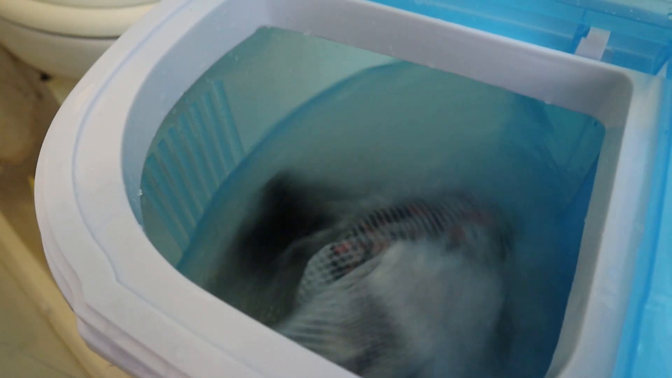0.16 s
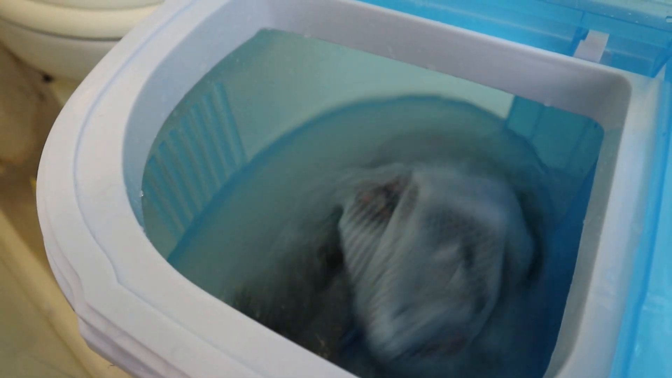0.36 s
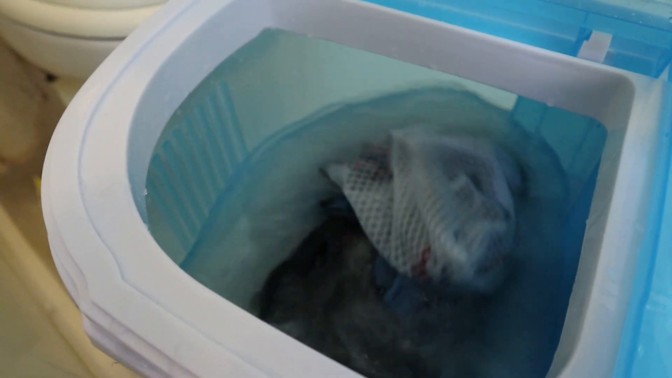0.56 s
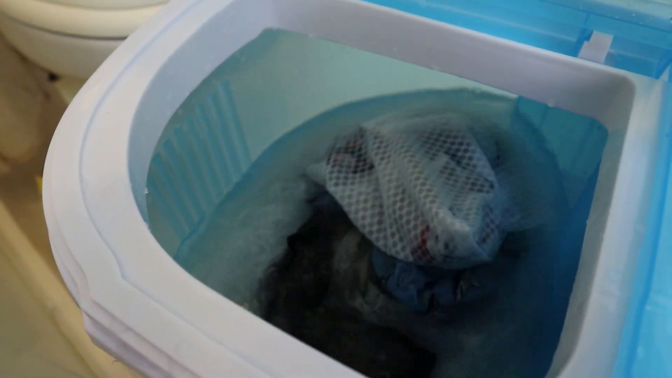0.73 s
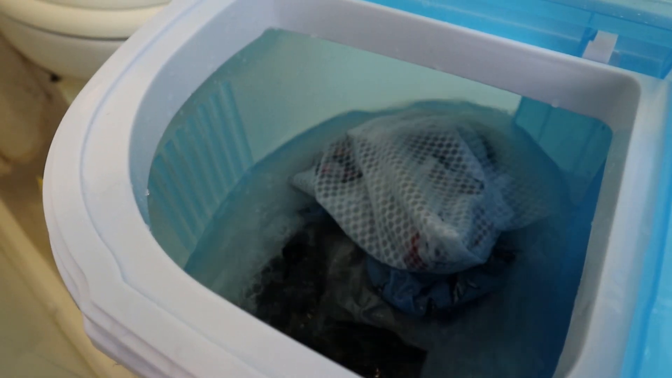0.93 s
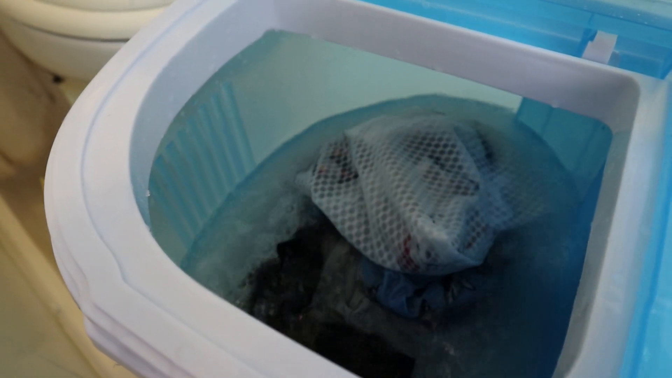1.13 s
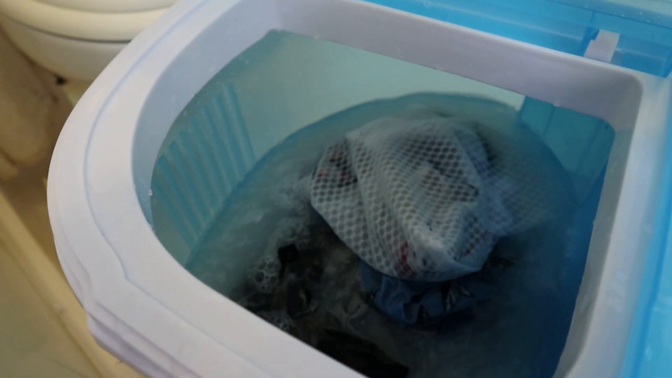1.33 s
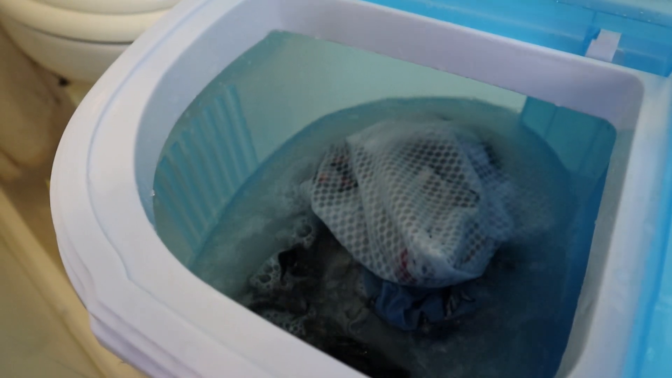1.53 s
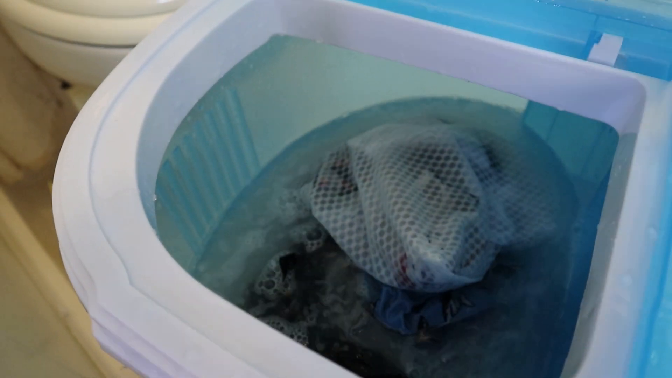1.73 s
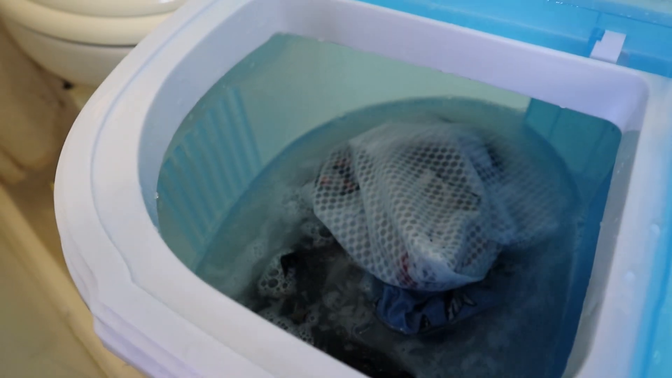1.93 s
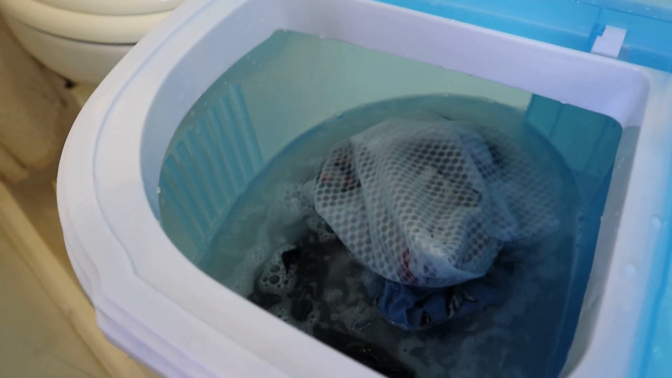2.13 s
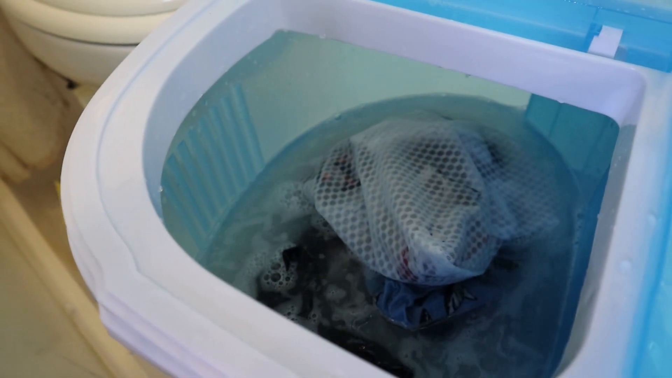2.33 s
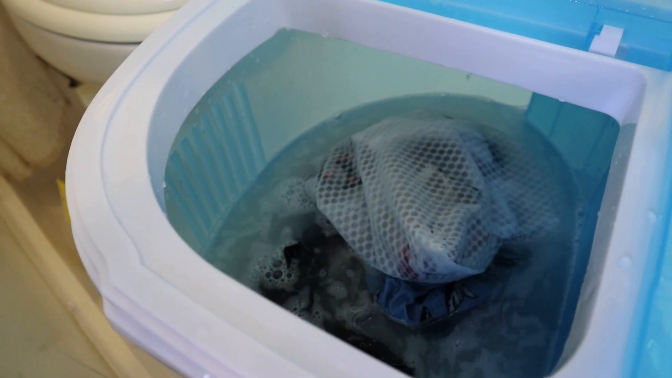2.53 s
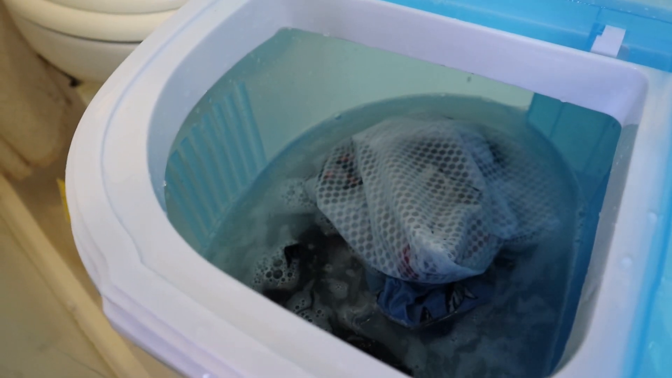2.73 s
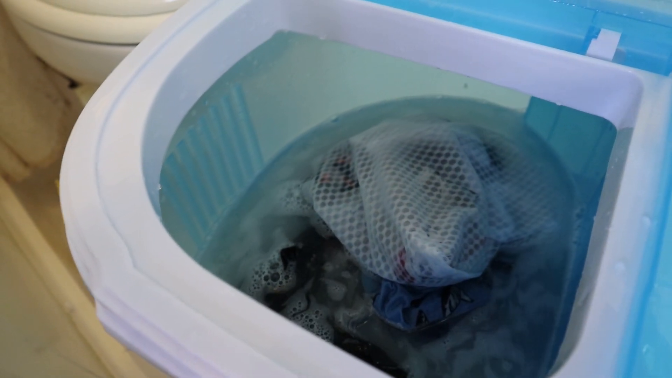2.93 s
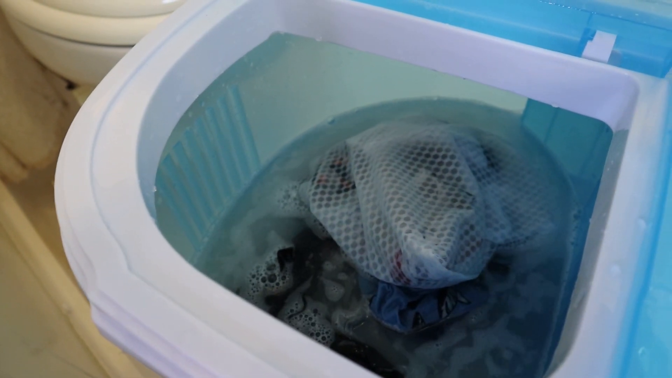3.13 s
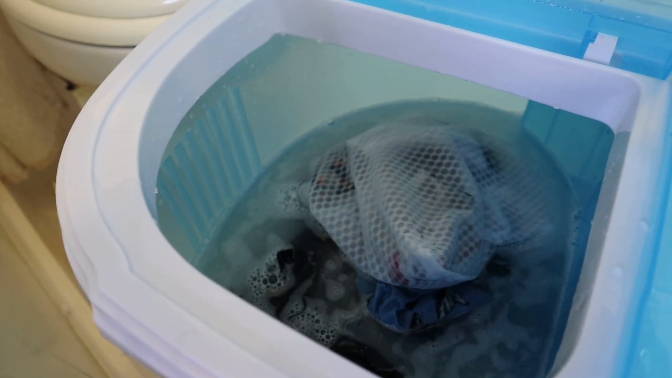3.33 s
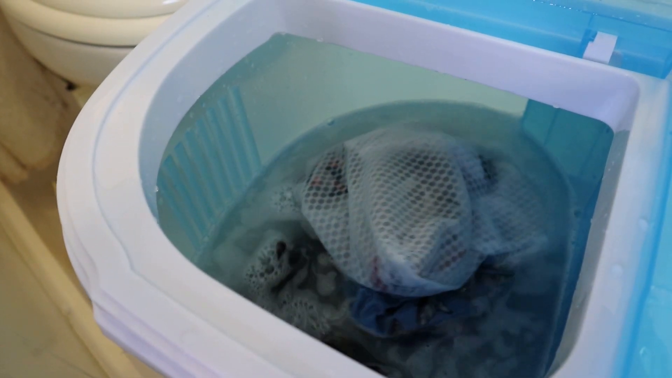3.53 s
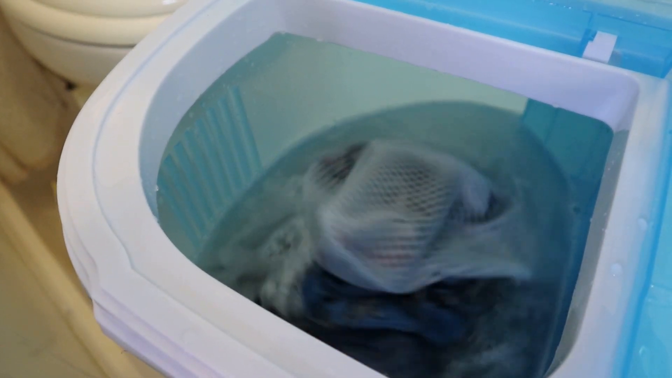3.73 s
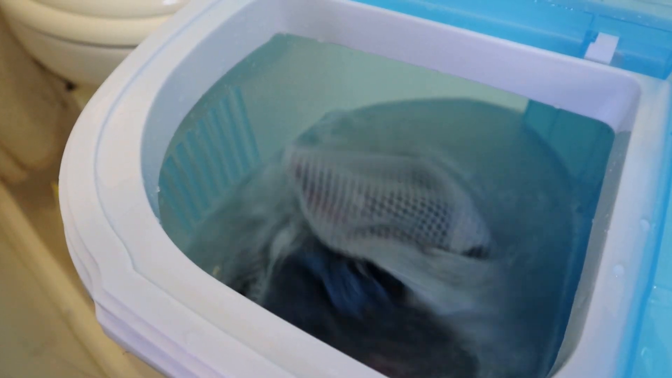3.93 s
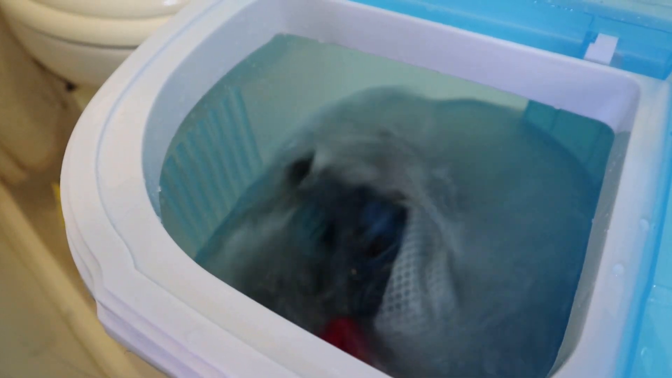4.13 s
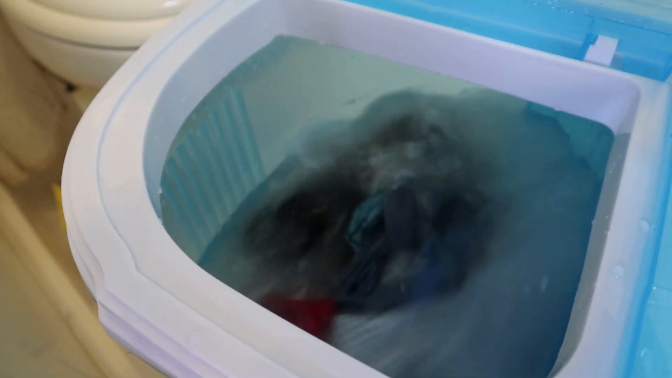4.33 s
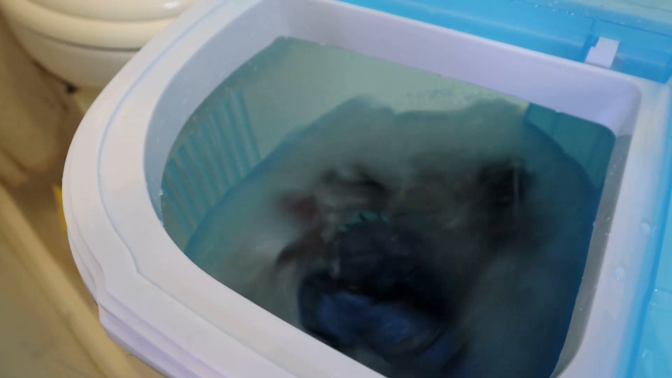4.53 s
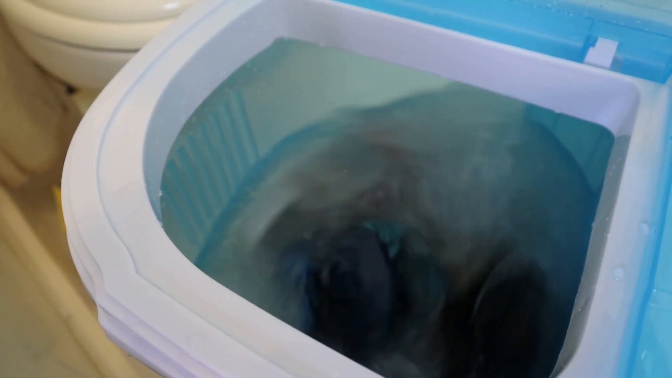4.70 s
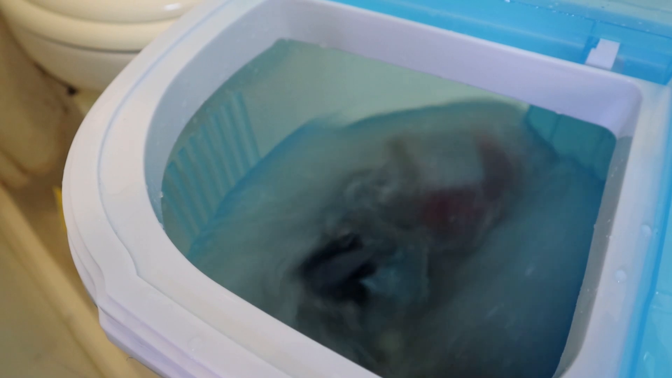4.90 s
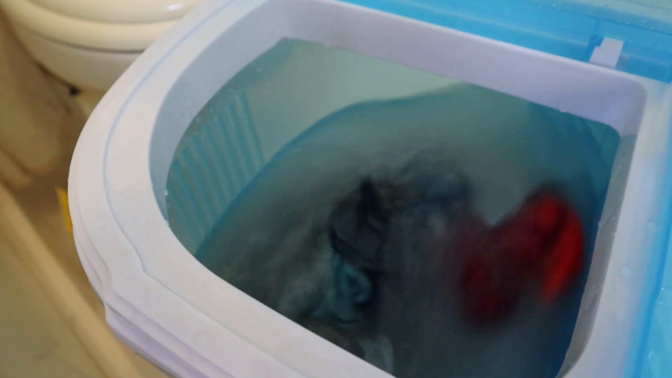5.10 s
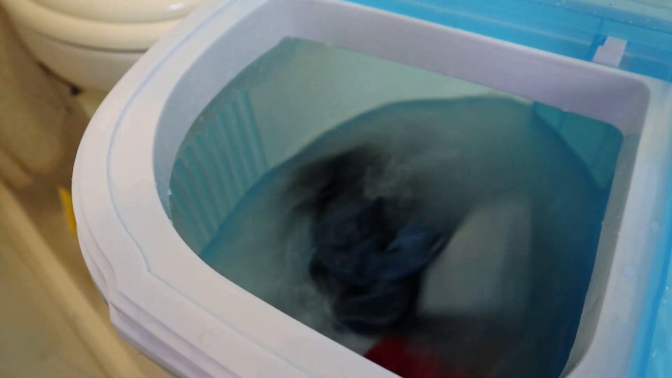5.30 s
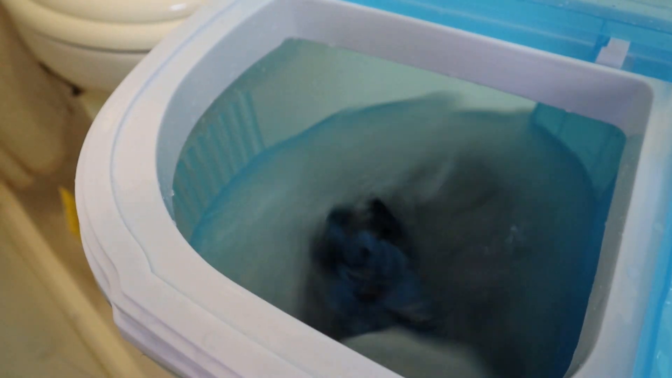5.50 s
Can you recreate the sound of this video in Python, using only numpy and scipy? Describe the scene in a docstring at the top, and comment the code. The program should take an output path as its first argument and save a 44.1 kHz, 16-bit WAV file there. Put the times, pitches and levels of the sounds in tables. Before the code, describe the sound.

A small plastic washing machine is heard from just above its open tub in a bathroom. At the start, water sloshes and splashes with gurgles and low bumps against the tub, dying away by about 1 second. A clockwork timer ticks rapidly throughout, around fifteen times a second, and stands out in the lull. Between 1 and 2 seconds there are faint popping suds, a couple of drips and soft gurgles. At about 3.2 seconds a switch snaps sharply with a brief squeak, and the motor starts with a steady low hum, rumble and light belt hiss. The ticking continues more softly. From about 4 seconds water and clothes churn again, with bubbling and wet slaps coming in waves, strongest around 4.4 and 5.3 seconds, and carrying on over the hum until the end, near 5.6 seconds.

```python
"""A small plastic washing machine in a bathroom, heard from just above its open tub.
At first the water sloshes to rest, its trapped air ringing as bubbles, while the clockwork wash timer
ticks about fifteen times a second, each impact exciting the modes of its panel. Suds pop in the lull.
At 3.2 s the timer's contact snaps shut and the motor starts, with magnetic hum and shaft harmonics.
From about 4 s water and clothes churn again, and the timer ticks on more softly."""
import sys
import numpy as np
from scipy import signal
from scipy.fft import rfft, irfft
from scipy.io import wavfile
from scipy.ndimage import uniform_filter1d

SR = 44100
rng = np.random.default_rng(int(sys.argv[2]) if len(sys.argv) > 2 else 0)


def transcribe(signal):
    """Save signal, clipped to [-1, 1], as a 16-bit WAV file at the path in sys.argv[1]."""
    frames = np.atleast_2d(signal).T
    limited = np.clip(frames, -1, 1)
    pcm = np.round(limited * 32767).astype(np.int16)
    wavfile.write(sys.argv[1], SR, pcm)


N = 245195
TIME = np.arange(N) / SR
AGE = np.arange(SR // 5) / SR  # time since an impact [s]


def gain_of(db):
    """Amplitude ratio of a level in decibels."""
    return 10 ** (np.asarray(db) / 20)


def unit_rms(x):
    """Normalisation to a mean power of 1."""
    return x / np.sqrt(np.mean(x ** 2) + 1e-20)


def unit_peak(x):
    """Normalisation of the loudest few milliseconds to a mean power of 1."""
    return x / np.sqrt(uniform_filter1d(x ** 2, size=150).max() + 1e-20)


def value_at(points, hz):
    """Interpolation on a logarithmic frequency axis."""
    f, value = np.transpose(points)
    return np.interp(np.log(hz + 1), np.log(f + 1), value)


def add(mix, s, sound):
    """Superposition of a sound on the mix, from time s."""
    part = mix[max(round(s * SR), 0):][:len(sound)]
    part += sound[:len(part)]


def coloured(x, spectrum, size=8192):
    """Minimum-phase filtering: a causal response with the given spectrum."""
    log_gain = np.log(gain_of(value_at(spectrum, abs(np.fft.fftfreq(size, 1 / SR)))))
    response = np.exp(np.conj(signal.hilbert(log_gain)))
    taps = np.fft.ifft(response).real[:size // 2]
    return signal.fftconvolve(x, taps)[:len(x)]


def noise(spectrum):
    """Stationary Gaussian noise of rms 1 with the given spectrum."""
    return unit_rms(coloured(rng.standard_normal(N), spectrum))


def wander(cutoff_hz):
    """Slow random modulation: low-pass noise of rms 1."""
    hz = np.fft.rfftfreq(N, 1 / SR)
    return unit_rms(irfft(rfft(rng.standard_normal(N)) / (1 + (hz / cutoff_hz) ** 4), N))


def decay(t60):
    """Exponential damping by 60 dB in t60 seconds."""
    return np.exp(-np.log(1000) * AGE / t60)


def onset(rise):
    """Exponential approach to full amplitude, with time constant rise."""
    return 1 - np.exp(-AGE / rise)


def swell(centre, width, t=AGE):
    """Gaussian envelope in time."""
    return np.exp(-.5 * ((t - centre) / width) ** 2)


def ring(hz, t60, rise, glide=0):
    """Damped oscillation whose frequency may climb by the fraction glide."""
    turns = np.cumsum(hz * (1 + glide * np.minimum(AGE / t60, 1))) / SR
    return np.sin(2 * np.pi * turns) * decay(t60) * onset(rise)


def clicks(per_s, spread_db):
    """Poisson process: impulses of random time, sign and size."""
    size = gain_of(spread_db * np.minimum(rng.exponential(1, N), 4))
    return size * rng.choice([-1, 1], N) * (rng.random(N) < per_s / SR)


# Background spectrum: (frequency [Hz], relative level [dB])
BACKGROUND_SPECTRUM = [(15, -13), (25, 4), (52, 8.5), (75, -11.5), (112, -2.5), (190, -10.5), (280, -9.5),
                       (400, -10), (640, -7), (950, -13), (1600, -19), (2700, -27), (3800, -21),
                       (5800, -34), (16000, -38)]
def background():
    """Ambient noise: steady, with its power mostly at low frequencies."""
    return gain_of(-40) * noise(BACKGROUND_SPECTRUM)


# Reverberation time of the room: (frequency [Hz], t60 [s])
ROOM_DECAY = [(100, 0.4), (500, 0.071), (2000, 0.22), (6000, 0.098), (15000, 0.12)]
def bathroom(x):
    """Reverberation: dense reflections from tub and tiles, each band decaying at its own rate."""
    reflections = rng.choice([-1., 1.], SR // 2) * (rng.random(SR // 2) < .1)
    hz, t, bands = signal.stft(reflections, SR, nperseg=256)
    damping = np.exp(-np.log(1000) * t / value_at(ROOM_DECAY, hz)[:, None])
    tail = signal.istft(bands * damping, SR, nperseg=256)[1]
    tail[:SR // 400] = 0  # delay before the first reflection
    return signal.fftconvolve(x, tail / np.linalg.norm(tail))[:N]


# Drips on the resting water: (time [s], level [dB])
DRIPS = [(1.149, -37), (1.705, -43)]
def foam():
    """Shot noise: bursting suds give ever fainter impulses, and drips land as short noise bursts."""
    pops = coloured(clicks(110, spread_db=-0.5), [(2000, -39), (6000, 6), (16000, -1)])
    out = gain_of(-54 - 6.6 * TIME) * unit_rms(pops)
    for s, db in DRIPS:
        impact = rng.standard_normal(len(AGE)) * decay(0.024)
        drip = coloured(impact, [(2000, -12), (7000, -6), (16000, 3)])
        add(out, s, gain_of(db) * unit_peak(drip))
    return out


# Waves striking the tub: (time [s], level [dB], frequency [Hz])
TUB_BUMPS = [(0.0, -22.5, 108), (0.008, -29, 191), (.218, -28, 118), (.45, -33, 89.5), (.55, -30, 79)]
def bumps():
    """Impact excitation: waves, then the last soft ripples, set the tub ringing at a low pitch."""
    out = np.zeros(N)
    laps = [(1.2 + 0.2 * k, -38.5, 104) for k in range(5)]
    for s, db, hz in TUB_BUMPS + laps:
        add(out, s, gain_of(db) * unit_peak(ring(hz, t60=0.12, rise=0.0017)))
    return out


# Spells of churning: (fully stirred [s], settling from [s], wave crest [s],
# relative wash level [dB], relative spray level [dB], slosh depth [dB])
SPELLS = [(-.5, 0.436, 0.29, -35.5, -48.5, 1), (4.356, 5.6, 4.57, -37, -49.5, 4)]
def stirring(slosh_period_s=0.497, slosh_decay_s=0.55, spray_lag_s=0.22):
    """Amplitude modulation by a sloshing wave: the wash builds and dies, the spray lags and lingers."""
    wash, spray = np.zeros(N), np.zeros(N)
    for full, stop, crest, wash_db, spray_db, depth_db in SPELLS:
        resting = np.maximum(TIME - stop, 0)
        until_wash = np.maximum(full - TIME, 0)
        until_spray = np.maximum(full + spray_lag_s - TIME, 0)
        wave = np.cos(2 * np.pi * (TIME - crest) / slosh_period_s)
        slosh_db = depth_db * np.exp(-resting / slosh_decay_s) * wave
        wash += gain_of(wash_db + slosh_db - 14.5 * until_wash - 38 * resting)  # slopes in dB/s
        spray += gain_of(spray_db + slosh_db - 20 * until_spray - 26.5 * resting)
    return wash, spray


def by_chance(per_s, envelope, count):
    """Jittered events that follow an envelope: rows of (time [s], level [dB], draw from -1 to 1)."""
    place, draw = rng.random((count, 2)).T
    times = (np.arange(count) + place) / per_s
    levels = 20 * np.log10(np.interp(times, TIME, envelope) + 1e-9)
    return zip(times, levels, 2 * draw - 1)


def bubbles(lo_hz, hi_hz, per_s, cycles, spread_db, count=36):
    """Minnaert resonance: bubbles of many sizes, each ringing briefly with a rising pitch."""
    cloud = np.zeros(N)
    for hz in np.geomspace(lo_hz, hi_hz, count):
        bubble = ring(hz, t60=cycles * (.5 + rng.random()) / hz, rise=1 / hz, glide=.045)
        cloud += hz * signal.oaconvolve(clicks(per_s / count, spread_db), bubble)[:N]
    return unit_rms(cloud)


# Spectra of the wash and of its fine spray: (frequency [Hz], relative level [dB])
WASH_SPECTRUM = [(150, 0.5), (400, -6.5), (750, -2.5), (1100, 0.5), (1700, 3), (2700, -2), (3600, 4),
                 (4600, -10.5), (5600, -12), (6800, -17.5), (8200, -21.5), (16000, -29)]
SPRAY_SPECTRUM = [(1500, -1), (3500, -2.5), (4600, -2), (5600, -5), (6800, -7.5), (8000, -7), (9300, -7),
                  (11000, -9.5), (16000, -25)]
def churn(wash, spray):
    """Incoherent summation: thousands of bubbles and drops merge into the rush of moving water."""
    clumps = wander(32)  # bursts as wet cloth breaks the surface
    cloud = unit_rms(coloured(bubbles(451, 8110, per_s=2200, cycles=37, spread_db=6), WASH_SPECTRUM))
    body = (gain_of(-6) * noise(WASH_SPECTRUM) + gain_of(1) * cloud) * gain_of(2.5 * clumps)
    drops = unit_rms(coloured(bubbles(2940, 14100, per_s=3300, cycles=32, spread_db=3), SPRAY_SPECTRUM))
    flicker_db = 0.5 * clumps + 4.94 * wander(52)
    return wash * body + spray * drops * gain_of(4 + flicker_db)


# Water folding over: (time [s], level [dB], centre frequency [Hz])
GURGLES = [(0.299, -21.5, 555), (.410, -27, 337), (1.566, -32, 574), (1.725, -29.5, 687), (3.351, -27, 817),
           (4.020, -28.5, 1000), (4.630, -29, 880), (5.360, -26, 886), (5.505, -21, 1000)]
def gurgles():
    """Air entrainment: folding water traps a run of bubbles that resonate around one pitch."""
    out = np.zeros(N)
    for s, db, hz in GURGLES:
        run = np.zeros(len(AGE))
        for delay, size, height in rng.random((16, 3)):
            bubble = ring(hz * (0.709 + 0.6 * height), t60=0.025, rise=0.001, glide=0.08)
            add(run, .055 * delay ** 1.7, gain_of(-8 * size - 15 * delay) * bubble)
        add(out, s, gain_of(db) * unit_peak(run))
    return out


# Large air pockets pulled under: (time [s], relative level [dB], frequency [Hz])
AIR_POCKETS = [(0.248, -5, 1810), (0.268, -13, 845), (0.303, -10, 1420), (0.393, -14, 678),
               (0.458, -18, 1510), (0.551, -20.5, 3440), (0.687, -18, 1596), (0.69, -19, 2550),
               (4.022, -23, 560), (4.418, -8, 1816), (4.504, -15, 2040), (4.624, -14.5, 1050),
               (4.651, -17, 693), (4.976, -11, 1610), (5.026, -19, 950), (5.24, -12.5, 1690),
               (5.364, -17, 1670), (5.511, -22.5, 1730)]
def gulps(wash, cycles=51):
    """Resonance at constant Q: air pockets ring among lesser bubbles, and smaller pockets die sooner."""
    out = np.zeros(N)
    lesser = [(s, db + 6.5, 1594 * 2 ** (draw / 2)) for s, db, draw in by_chance(7.2, wash, count=36)]
    for s, db, hz in AIR_POCKETS + lesser:
        t60 = cycles / hz
        gulp = ring(hz, t60, rise=0.00059, glide=0.03)
        for delay, size in rng.random((8, 2)):
            neighbour = ring(hz * (0.706 + 0.535 * size), t60 / 2, rise=0.00014, glide=0.32)
            add(gulp, .009 * delay ** 2, gain_of(-8) * neighbour)
        add(out, s, gain_of(db - 6) * unit_peak(gulp))
    return out


# Water hitting cloth and wall: (time [s], level [dB], relative level of the finest spray [dB])
SLAPS = [(0.0622, -20.5, -18), (0.3023, -23.5, -14), (0.3458, -25.5, -16), (0.393, -22, -1),
         (0.465, -28, -28), (0.592, -32, -3), (4.3234, -35, -8), (4.4257, -22.5, -10), (4.4343, -15.5, -13),
         (4.5046, -24, -31), (4.566, -27.5, -5), (4.6415, -24, -6.5), (4.7142, -24.5, -18),
         (5.0263, -29, 0), (5.1043, -22.5, -1), (5.1926, -23, -29), (5.238, -25.5, -8), (5.3303, -16.5, -5)]
# Spectrum of a slap: (frequency [Hz], relative level [dB])
SLAP_SPECTRUM = [(300, 0.5), (800, -3.5), (1800, -5.5), (2800, -6.5), (4000, 1), (5600, -5), (6800, -3),
                 (8200, -10), (10000, -10.5), (16000, -19)]
def slaps(spray, lead_s=0.0071):
    """Liquid impact: a sheet of water gathers, lands as a broadband burst and scatters into droplets."""
    out = np.zeros(N)
    lesser = [(s, db + 16, -12 + 5 * draw) for s, db, draw in by_chance(8.5, spray, count=50)]
    envelope = np.minimum(np.exp((AGE - lead_s) / 0.0032), np.exp((lead_s - AGE) / 0.0034))
    for s, db, fine_db in SLAPS + lesser:
        burst = rng.standard_normal(len(AGE)) * envelope
        for delay, size, height in rng.random((18, 3)):
            droplet = ring(1500 * 7 ** height, t60=0.0061, rise=0.00018, glide=0.18)
            add(burst, 0.04 * delay, gain_of(5.5 - 13.5 * size - 15.3 * delay) * droplet)
        spectrum = [(hz, level + (fine_db + 9.5) * np.clip((hz - 4000) / 4000, 0, 1))
                    for hz, level in SLAP_SPECTRUM]
        add(out, s - lead_s + .002, gain_of(db) * unit_peak(coloured(burst, spectrum)))
    return out


def harmonic(order, turns):
    """Harmonic of a rotation or cycle: a sinusoid of rms 1 and random phase."""
    return np.sqrt(2) * np.sin(2 * np.pi * (order * turns + rng.random()))


# Harmonics of the turning shaft and of the magnetic hum: (harmonic number, level [dB])
SHAFT_HARMONICS = [(1, -47), (2, -27), (4, -21), (5, -26.5), (8, -49), (10, -24.5), (14, -63), (16, -47)]
HUM_HARMONICS = [(1, -40.5), (2, -20.5), (4, -93), (6, -45.5)]
# Rumble under the changing load on the drive: (time [s], relative level [dB])
DRIVE_LOAD = [(3.33, -16.5), (4.41, -18.5), (4.46, -27), (4.55, -20), (5.42, -18.5), (5.46, -19),
              (5.56, -21.5)]
# Spectra of the shaken tub and of belt and bearings: (frequency [Hz], relative level [dB])
RUMBLE_SPECTRUM = [(20, -49), (45, -21), (80, -12.5), (105, -1.5), (140, 3), (158, -7), (185, 0), (212, -8),
                   (262, 2.5), (290, -3.5), (325, -13), (410, -22), (462, -16), (520, -29), (900, -61.5)]
BELT_SPECTRUM = [(300, -4.5), (540, -3.5), (720, 3), (1000, -7), (1300, -6), (1900, -5.5), (2700, -15),
                 (3700, -10), (5000, -20), (6600, -29), (10000, -50), (16000, -55)]
def motor(on_s=3.245, surge_s=3.41, shaft_hz=28, mains_hz=60):
    """Forced vibration: shaft harmonics beat against mains hum, the tub rumbles and the belt hisses."""
    powered = np.clip((TIME - on_s) / 0.084, 0, 1)
    running = np.clip((TIME - on_s - .03) / 0.069, 0, 1)
    load_db = np.interp(TIME, *np.transpose(DRIVE_LOAD))
    strain_db = 0.068 * (load_db - np.mean(DRIVE_LOAD, axis=0)[1])
    turns = np.cumsum(shaft_hz * (1 + 0.0032 * wander(5.3))) / SR
    shaft = np.zeros(N)
    for k, db in SHAFT_HARMONICS:  # higher harmonics flutter more and follow the load more
        flutter = 1 + 0.046 * np.sqrt(k) * wander(6.2)
        shaft += gain_of(db + k * strain_db) * flutter * harmonic(k, turns)
    hum = sum(gain_of(db) * harmonic(k, mains_hz * TIME) for k, db in HUM_HARMONICS)
    rumble = gain_of(load_db - 0.5) * noise(RUMBLE_SPECTRUM)
    surge_db = 6.5 * swell(surge_s, 0.055, TIME)  # the drive strains to set the water moving
    hiss_db = -35 + 0.7 * (TIME - surge_s) + surge_db
    hiss = gain_of(hiss_db) * noise(BELT_SPECTRUM) * (1 + 0.26 * np.sin(2 * np.pi * turns))
    return running * (shaft + rumble) + powered * (hum + hiss)


# Snaps of the timer's contact: (time [s], level [dB])
SNAPS = [(3.242, -16.5), (3.2495, -20.5)]
# Spectrum of a snap: (frequency [Hz], relative level [dB])
SNAP_SPECTRUM = [(180, -17), (300, 1), (701, -5.5), (1030, -15), (2070, -0.5), (3080, -12.5), (3950, -8),
                 (5430, -16.5), (9090, -25), (14700, -34), (16000, -41)]
def contact(squeak_s=3.238, squeak_hz=1814, squeak_db=-23.5):
    """Impact transients: the switch snaps twice, and a short squeak follows as the drive starts."""
    out = np.zeros(N)
    for s, db in SNAPS:
        crack = rng.standard_normal(len(AGE)) * (decay(0.019) + decay(0.12)) * onset(0.00087)
        add(out, s, gain_of(db) * unit_peak(coloured(crack, SNAP_SPECTRUM)))
    turns = np.cumsum(squeak_hz * (1 + 0.0078 * wander(60)[:len(AGE)])) / SR
    add(out, squeak_s, gain_of(squeak_db) * swell(0.047, 0.019) * np.sin(2 * np.pi * turns))
    return out


def beat_times(period_s=.06845, quicken_s=.000178, beats_per_turn=16.75):
    """Period modulation: the escapement quickens, swings with its wheel and limps on alternate beats."""
    k = np.arange(-11, 77)
    quickening = .8291 + period_s * k - quicken_s * k ** 2 / 2
    swing = .003 * np.cos(2 * np.pi * k / beats_per_turn)
    limp = .00045 * np.cos(np.pi * k)
    return quickening - swing + limp


# Modes of the timer and its plastic panel: (frequency [Hz], relative level [dB], t60 [s], rise [s])
PANEL_MODES = [(278, 8, 0.069, 0.02), (321, -18, 0.16, 0.011), (472, -13.5, 0.26, 0.0094),
               (1098, -15.5, 0.15, 0.00038), (1300, -18, 0.048, 0.00073), (1400, -21, 0.01, .0005),
               (1558, 9, 0.01, 0.0004), (1589, -2, 0.05, 0.00029), (1888, -11.5, 0.1, 0.0015),
               (2010, -27, 0.043, 0.0016), (2250, -36, 0.0577, 0.0014), (2480, -17.5, 0.051, 0.0013),
               (3176, -23, 0.046, 0.0029), (3410, -15, 0.18, 0.0078), (3870, -12.5, 0.073, 0.0075),
               (4280, -23, 0.1, 0.0038), (4620, -19.5, 0.055, .002), (4900, -22, 0.077, 0.0024)]
# Spectrum of the rattling gear train: (frequency [Hz], relative level [dB])
GEAR_SPECTRUM = [(200, -8), (500, -8), (900, -16), (1200, -2), (1650, -0.5), (2200, -5), (2900, -18),
                 (3500, -8.5), (4000, -9), (4300, -25), (4900, -20), (5800, -27.5), (8000, -35),
                 (16000, -48)]
def timer(jitter_s=.0002, tock_hz=652):
    """Modal ringing: the pallet strikes, rebounds twice, then scrapes back with a lower tock."""
    beats = beat_times()
    slip, force = rng.standard_normal((len(beats), 2)).T
    switched = beats > SNAPS[0][0] - .034  # softer from the beat nearest the contact's snap
    levels = -27.5 + 0.48 * force - 6 * switched
    panel = sum((-1) ** k * gain_of(db) * ring(hz, t60, rise)
                for k, (hz, db, t60, rise) in enumerate(PANEL_MODES))
    pallet = ring(1590, t60=.014, rise=.0002)
    case = rng.standard_normal(len(AGE)) * decay(0.14) * onset(0.0043)
    body, gears = np.zeros(N), np.zeros(N)
    for s, db in zip(beats + jitter_s * slip, levels):
        bounce_time, bounce_size, tock_time, tock_pitch = rng.standard_normal(4)
        rattle, scrape = rng.standard_normal((2, len(AGE)))
        add(body, s, gain_of(db + 1.5) * panel - gain_of(db + 7.5) * pallet)
        add(body, s + .0038, -gain_of(db - 6) * pallet)
        add(body, s + .0069 + .00005 * bounce_time, -gain_of(db - 3.5 + bounce_size) * pallet)
        tock = swell(.008, .0035) * np.sin(2 * np.pi * tock_hz * (1 + .024 * tock_pitch) * AGE)
        add(body, s + .0325 + .00068 * tock_time, gain_of(db - 1) * tock)
        add(body, s + .029 + .000814 * tock_time, gain_of(db - 14.5) * panel)
        add(gears, s, gain_of(db - 4) * case + gain_of(db + 8) * rattle * decay(0.11))
        add(gears, s, gain_of(db + 4.5) * scrape * swell(0.036, 0.0052))
    return body + coloured(gears, GEAR_SPECTRUM)


def scene():
    """Superposition of the direct sounds and the reverberation of water and clockwork."""
    wash, spray = stirring()
    water = churn(wash, spray) + gulps(wash) + slaps(spray) + bumps() + gurgles() + foam()
    clockwork = timer() + contact()
    reverberation = bathroom(gain_of(-9.5) * water + gain_of(-14) * clockwork)
    return (water + clockwork + reverberation + motor() + background())[None]


def record(dry, cutoff_hz=15950):
    """Band limiting: a linear-phase low-pass filter removes the highest treble."""
    lowpass = signal.firwin(511, cutoff_hz, window=("kaiser", 9), fs=SR)
    return signal.oaconvolve(dry, lowpass[None], "same")


dry = scene()
out = record(dry)
transcribe(out)
```